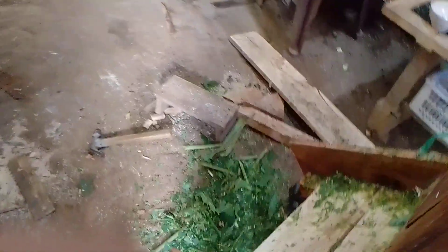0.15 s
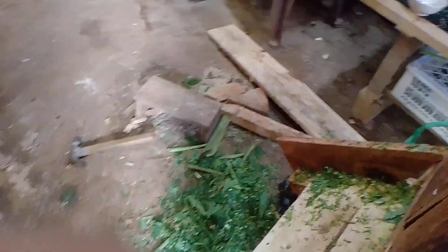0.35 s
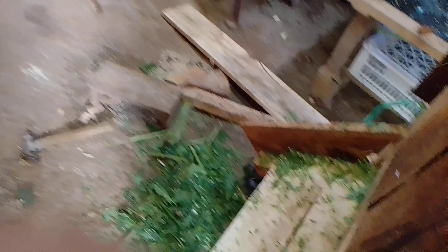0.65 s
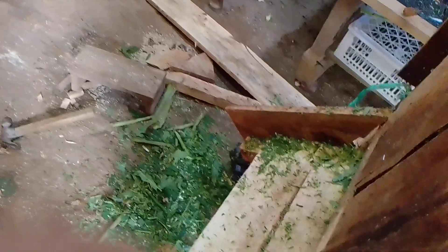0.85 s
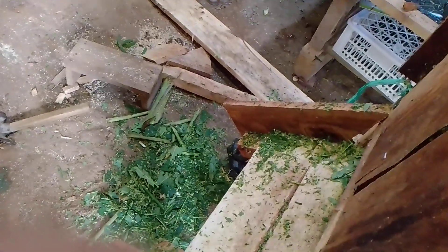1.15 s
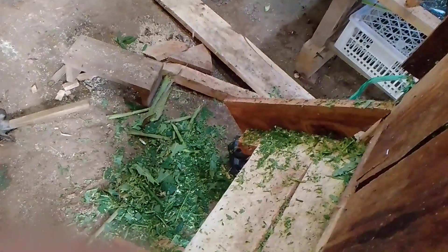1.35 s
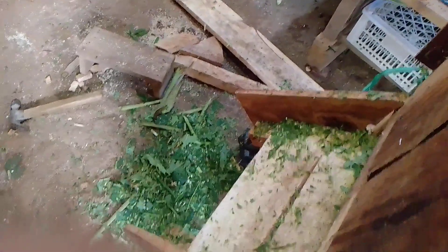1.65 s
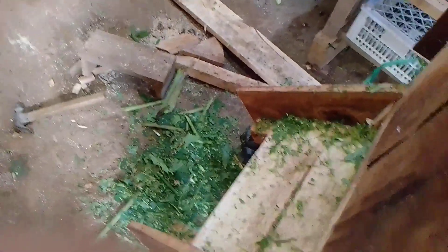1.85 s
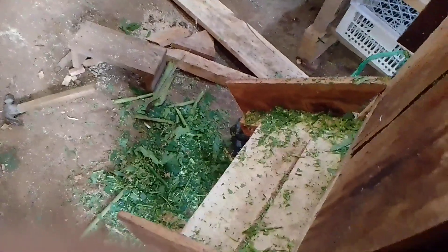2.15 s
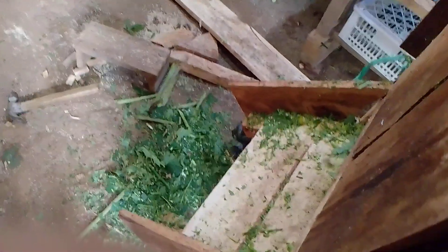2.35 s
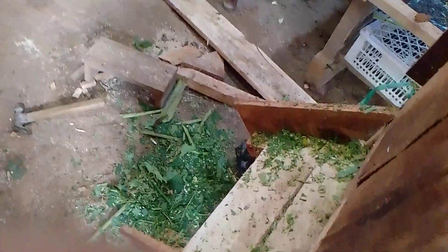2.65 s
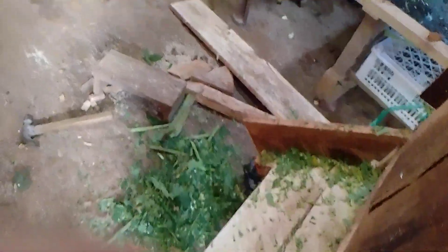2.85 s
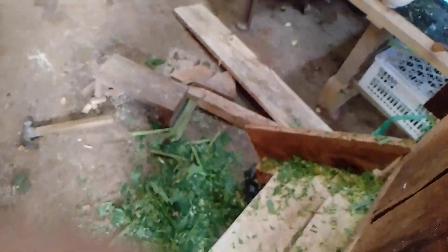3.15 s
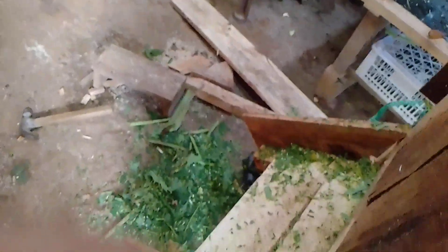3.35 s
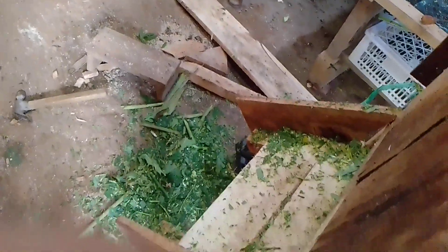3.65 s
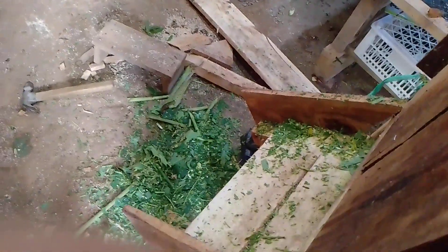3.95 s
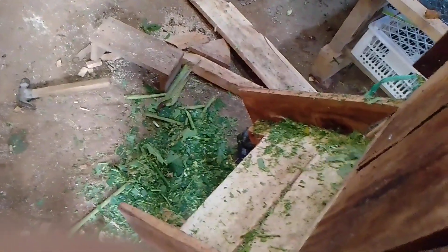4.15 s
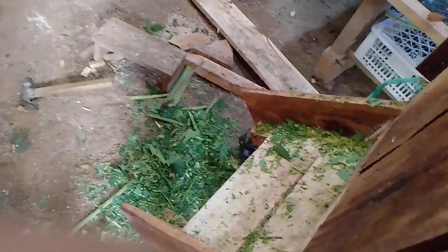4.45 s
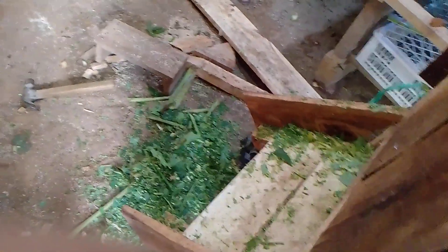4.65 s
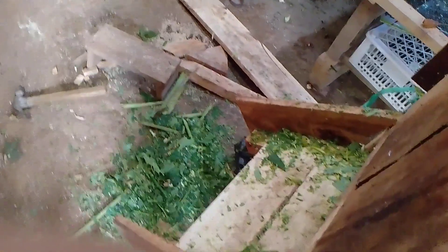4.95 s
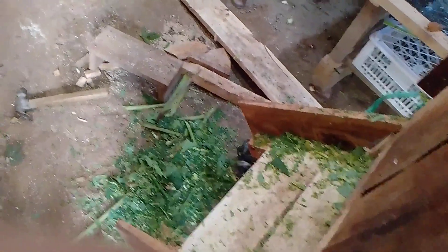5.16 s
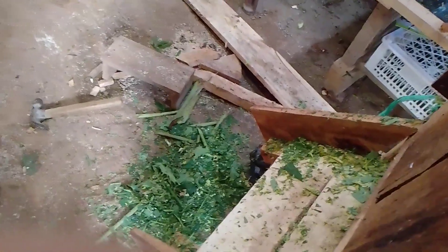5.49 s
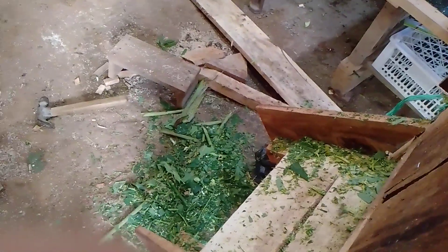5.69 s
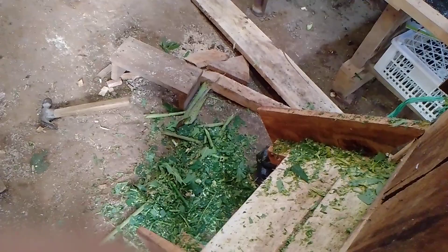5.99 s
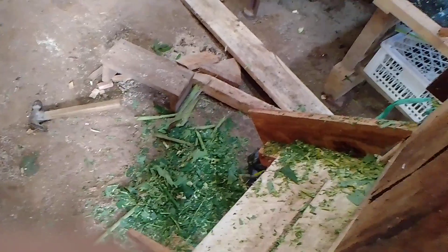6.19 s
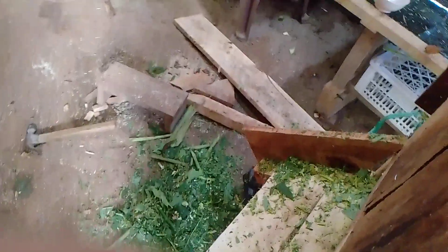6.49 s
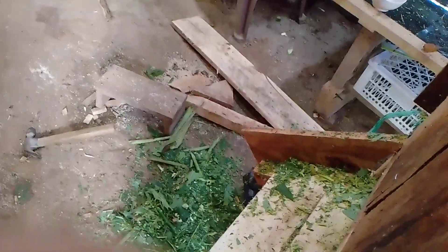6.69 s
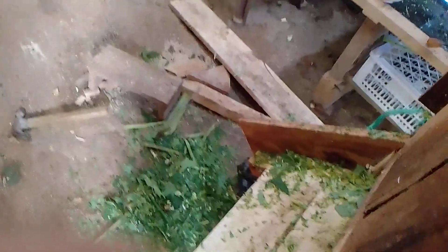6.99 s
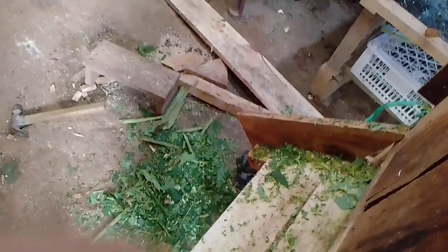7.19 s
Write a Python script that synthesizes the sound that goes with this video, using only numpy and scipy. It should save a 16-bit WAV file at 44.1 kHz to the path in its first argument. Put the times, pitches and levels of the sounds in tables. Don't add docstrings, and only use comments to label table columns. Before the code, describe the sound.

A homemade motor-driven chopper buzzes and whines steadily up close while stalks fed in ring the steel blades, snap sharply and rattle the wooden box.

```python
import sys
import numpy as np
from scipy import signal
from scipy.fft import rfft, irfft, next_fast_len
from scipy.io import wavfile
from scipy.ndimage import uniform_filter1d, map_coordinates

SR = 44100
rng = np.random.default_rng(int(sys.argv[2]) if len(sys.argv) > 2 else 0)


def inscribe(sig):
    pcm = np.round(np.clip(np.atleast_2d(sig).T, -1, 1) * 32767)
    wavfile.write(sys.argv[1], SR, pcm.astype(np.int16))


def gain_from_db(level_db):
    decades = np.asarray(level_db, float) / 20
    return 10 ** decades


N = 323253
TIME = np.arange(N) / SR
GRID = np.arange(0, N / SR + .01, .005)
LONG = next_fast_len(N)

IDLE_TURNS, MOTOR_LAG_S = 49.4, .06
STILL_S = 0.19
KNOCK_STEPS = 768
FLOW_USUAL_DB, RING_USUAL_DB = -41, -20
SPRAY_S = 0.038

# t/s, length/s, sag/(turns/s)
STALKS = [(.44, .1, .4), (.44, 2.66, .22), (1.33, .2, .8), (2.04, .22, 1.1), (2.59, .14, .42),
          (3.3, 1.34, .82), (3.5, .32, .7), (4.64, .2, .33), (5.17, .16, .35), (5.33, .64, .74),
          (5.74, .23, .3), (6.72, .7, .62), (6.72, .14, .4), (7.14, .3, .22)]
BOX_EDGES_HZ = [780, 1500, 2250, 4200, 6900]
# f/Hz, level/dB per Hz
BOX_COLOUR = [(150, -35.5), (300, -9), (800, -3.5), (1020, 2.5), (1300, -4), (2000, -6), (2950, -6.5),
              (4000, -13), (6500, -22.5), (7200, -36.5), (10300, -37.5), (12800, -50.5), (15700, -38.5)]
# usual level/dB, dB per dB of chaff, dB per dB of disc ring, dB per snap
BOX_PARTS = [(-33.5, .5, -0.21, 3), (-28.5, 0.82, -0.13, 1.5), (-25, .5, 0.16, 3), (-24.5, 0.5, 0.09, 2.5),
             (-35.5, 1.25, 0, 6), (-42.5, 1.5, 0, 0.5)]
# t/s, level/dB
CHAFF_FLOW = [(0.0, -41.5), (0.24, -42), (0.47, -34), (0.53, -37.5), (1.47, -36), (1.51, -41), (1.71, -37),
              (2.16, -42.5), (2.23, -41.5), (2.51, -44), (3.98, -39), (4.96, -39.5), (5.0, -43), (5.2, -37),
              (6.55, -42.5), (6.78, -39.5), (7.23, -38), (7.33, -34)]
# f/Hz, width/Hz, level/dB
DISC_RINGS = [
    [(1747, 44, 0)],
    [(2398, 30, 0)],
    [(2797, 28, 0)],
    [(3255, 10, 0)],
    [(3350, 60, 0), (3450, 60, -3), (3542, 40, 0)],
    [(3061, 11, 0)],
]
BEAMING = [
    [(-2, .34), (2, .26)],
    [(-4, .2), (-2, .75), (2, -.5), (4, .45)],
    [(-6, .2), (-4, -.28), (-2, .46), (2, .3)],
    [],
    [],
    [],
]
UNTOUCHED_DB = [-31, -39, -53, -34.5, -34.5, -37.5]
# t/s, length/s, level/dB
MAIN_TOUCH = [(.45, 0.095, -18.5), (.62, 0.49, -30), (1.29, 0.084, -16), (1.47, 0.11, -15),
              (1.61, 0.044, -15), (1.7, 0.19, -26.5), (1.86, 0.078, -17.5), (1.93, 0.17, -14.5),
              (2.08, 0.095, -11), (2.2, 0.13, -15), (2.28, .1, -12.5), (2.4, 0.37, -15), (2.64, 0.098, -13),
              (2.76, 0.095, -19), (2.84, 0.144, -16.5), (3.01, 0.21, -19.5), (3.18, 0.16, -13),
              (3.36, .07, -17.5), (3.44, 0.072, -16), (3.59, 0.25, -23), (4.02, 0.1, -19.5),
              (4.11, 0.57, -17), (4.72, 0.063, -21.5), (4.84, 0.053, -18.5), (5.06, .03, -23),
              (5.09, 0.06, -20.5), (5.28, 0.12, -16), (5.44, 0.099, -18.5), (5.52, 0.47, -16.5),
              (6.02, 0.21, -28.5), (6.62, 0.023, -23), (6.69, 0.032, -18), (6.79, 0.14, -18.5),
              (6.955, 0.46, -17.5)]
# t/s, length/s, level/dB
SECOND_TOUCH = [(.55, .9, -24.5), (1.33, 0.17, -27.5), (2.05, 0.063, -22), (2.18, 0.07, -24),
                (2.39, .16, -22), (2.72, 0.037, -38), (2.795, 0.092, -20), (2.94, 0.12, -20.5),
                (3.12, 0.12, -28), (3.33, 0.088, -17), (3.43, 0.202, -20.5), (3.66, 0.19, -16.5),
                (3.91, 0.2, -18.5), (4.13, 0.25, -33), (4.5, 0.076, -32.5), (4.59, 0.065, -27),
                (5.1, 0.15, -22.5), (5.28, 0.15, -23.5), (5.509, 0.089, -21.5), (5.63, 0.12, -18.5),
                (5.8, 0.038, -23), (5.88, 0.12, -25), (6.65, .06, -19), (6.71, 0.088, -13.5),
                (6.82, 0.19, -24), (6.93, .06, -20), (6.99, 0.14, -16.5), (7.16, 0.18, -27.5)]
# t/s, length/s, level/dB
THIRD_TOUCH = [
    (.5, 1.2, -30.5),
    (2.072, 0.036, -19),
    (2.45, 0.052, -23.5),
    (2.62, 0.11, -21),
    (2.72, 0.11, -15),
    (2.85, 0.2, -27),
    (3.88, 0.18, -24),
    (4.7, .8, -34),
]
# t/s, length/s, level/dB
RIM_TOUCH = [(.36, 0.12, -26.5), (.5, 1, -33), (3.1, .2, -33), (3.64, 0.23, -27), (4.26, 0.15, -22.5),
             (4.52, 0.34, -25.5), (4.85, 0.18, -38), (5.11, 0.14, -28), (5.24, .08, -24), (5.49, 0.14, -26),
             (5.63, 0.051, -22), (5.78, 0.036, -33), (5.95, 0.065, -23), (6.02, 0.27, -24),
             (6.22, .18, -28), (6.4, 0.18, -33), (6.62, 0.28, -28), (6.88, 0.078, -21.5), (7.0, 0.18, -29),
             (7.24, 0.11, -23)]
# t/s, length/s, level/dB
EDGE_TOUCH = [
    (0.901, 0.55, -41),
    (2.19, 0.12, -25),
    (2.38, 0.2, -25),
    (2.72, 0.55, -26),
    (3.92, 0.34, -25.5),
    (4.3, 0.38, -27),
    (5.11, 0.19, -24),
    (6.66, 0.084, -38),
]
# t/s, length/s, level/dB
LOW_RIM_TOUCH = [
    (0, 0.31, -28),
    (1.3, 0.11, -28.5),
    (1.7, 0.15, -25),
    (3.64, 0.13, -25.5),
    (4.27, 0.18, -24.5),
    (4.52, 0.078, -25.5),
    (6.02, 0.055, -27),
    (6.88, .08, -30),
]
# f/Hz, width/Hz, level/dB
TICK_MODES = [(4080, 620, 7), (4700, 900, 0), (5600, 1500, -14), (8930, 280, -11), (11000, 1800, -27),
              (15500, 960, -19)]
# t/s, length/s, level/dB
TICK = [(0, .36, -33), (.36, .55, -33.5), (1.0, .3, -28.5), (1.32, .18, -31), (1.6, .1, -29),
        (1.68, .22, -26), (1.9, .13, -29), (2.2, .15, -37), (3.2, .3, -39), (3.75, .45, -35),
        (5.2, .85, -38), (6.62, .12, -31), (6.85, .48, -38)]
# t/s, length/s, f/Hz, width/Hz, level/dB
SCRAPES = [(.0, .25, 3000, 200, -27), (.2, .25, 3250, 200, -31), (.15, .35, 2750, 180, -28.5),
           (.3, .2, 2250, 400, -31), (.45, 1.0, 3480, 250, -31), (1.505, .5, 8800, 500, -46),
           (1.9, .35, 1300, 200, -23), (2.354, 1.0, 1340, 245, -26), (3.08, .13, 5800, 1500, -35),
           (3.9, 1.1, 560, 150, -34), (3.62, .2, 4400, 200, -33), (3.9, .32, 4700, 500, -32),
           (5.143, .17, 5520, 540, -29), (5.96, .3, 4640, 450, -33), (2.18, .15, 4400, 1000, -28),
           (5.98, .75, 2950, 200, -31), (6.1, .65, 2720, 130, -33), (.45, 1.65, 2890, 90, -31),
           (6.68, .3, 4500, 400, -33), (6.95, .35, 5700, 500, -37), (.7, .45, 3550, 150, -31),
           (2.75, .55, 3430, 320, -29), (3.93, .7, 3430, 320, -28), (4.58, .25, 8200, 250, -48),
           (5.1, .95, 8100, 250, -47), (6.4, .93, 8100, 250, -46), (3.85, .4, 9100, 250, -48),
           (5.1, .95, 9100, 250, -49)]
PURE_HZ = [2285, 2707, 2895, 4353, 4452, 4648, 4748, 5093, 5308, 5410, 5922, 6115, 6503, 6697]
# t/s, length/s, level/dB
PURE_TOUCH = [
    [(3.6, .2, -31), (3.92, .75, -28.5), (4.7, .25, -32), (5.45, .5, -30), (6.82, .36, -28)],
    [(.1, .7, -36), (4.9, .2, -37), (6.3, .4, -33)],
    [(0, .45, -35), (1.7, .3, -33), (4.7, .4, -36), (6.1, .6, -34)],
    [(.3, .2, -40), (3.0, .3, -36), (3.66, .12, -33), (4.3, .22, -37), (5.93, .3, -33), (6.8, .12, -32)],
    [(.6, .3, -38), (1.93, .1, -35), (2.72, .25, -35), (3.66, .5, -34), (6.2, .35, -37), (6.73, .27, -32)],
    [(5.97, .17, -27), (6.14, .15, -32)],
    [(3.9, .3, -35)],
    [(2.8, .9, -39), (5.08, .08, -35), (6.6, .12, -36)],
    [(.55, .4, -41), (3.9, .4, -39)],
    [(5.15, .14, -31)],
    [(3.08, .12, -39), (4.2, .3, -43), (6.2, .4, -44)],
    [(2.85, .55, -40), (4.9, .2, -42), (5.08, .1, -36), (6.65, .1, -36), (6.85, .17, -38)],
    [(4.1, .48, -42)],
    [(3.08, .12, -39), (5.4, .25, -43)],
]
# t/s, length/s, level/dB
SEVENTH = [
    (0, 0.55, -39),
    (2.05, 0.23, -30.5),
    (2.45, 1.12, -37),
    (3.95, 0.59, -37.5),
    (5.13, 0.22, -33),
    (6.03, 0.58, -39.5),
]
# t/s, length/s, level/dB
EIGHTH = [
    (.4, 0.11, -35.5),
    (.92, 0.71, -41),
    (2.0, 0.18, -35),
    (2.2, 0.082, -29.5),
    (3.37, 1.18, -34.5),
    (3.6, 0.099, -27.5),
    (4.57, 0.76, -41.5),
    (5.3, 0.34, -39),
    (5.8, 1.1, -41.5),
]
# t/s, length/s, level/dB
NINTH = [
    (1.3, 0.42, -37.5),
    (1.86, 0.82, -33.5),
    (2.67, 1, -38.5),
    (3.86, 0.93, -36),
    (5.14, 0.21, -38),
]
# t/s, length/s, level/dB
FRAME_MODE = [
    (.63, 1.4, -29),
    (3.06, 0.12, -31.5),
    (3.4, 0.097, -28.5),
    (3.9, 0.88, -24.5),
    (5.35, 0.46, -32.5),
    (6.86, 0.2, -29),
]
# t/s, length/s, level/dB
FOURTH = [
    (1.27, 1.0, -42.5),
    (3.09, .56, -38),
    (3.85, 0.91, -37),
    (5.12, 0.18, -33),
    (5.37, 0.35, -40),
    (6.62, 0.6, -39),
]
# shaft multiple, level/dB
HUM_ORDERS = [(1, -71), (2, -60), (3, -62.5), (5, -53.5)]
# f/Hz, level/dB
MAINS = [(100.5, -55), (204, -49.5), (302, -46.5)]
# t/s, length/s, level/dB
DRUMMING = [(.3, 0.6, -29), (.94, 0.64, -27), (1.71, 0.23, -24), (2.0, 0.22, -32), (2.8, .38, -38),
            (3.38, .04, -23), (3.52, 0.13, -34), (3.9, 1.5, -32.5), (5.19, 0.15, -32), (5.35, 0.2, -32),
            (6.0, 0.7, -28)]
# t/s, length/s, shaft multiple, level/dB
WEDGED = [(1.95, 0.17, 20, -30.5), (1.95, 0.14, 21, -38), (1.9, .22, 26, -31), (2.12, 0.17, 20, -29.5),
          (2.12, 0.12, 22, -28.5), (2.45, 0.39, 21, -29.5), (2.85, .33, 20, -35), (2.9, .28, 21, -33),
          (2.85, 0.37, 23, -35), (2.4, 0.34, 26, -36), (3.38, 0.31, 20, -31), (3.38, .26, 22, -37),
          (3.6, 0.64, 21, -36), (3.95, 0.68, 23, -31), (5.18, 0.16, 20, -31), (5.18, 0.17, 21, -29),
          (5.18, 0.175, 26, -27), (3.95, 0.66, 11, -40), (3.9, 0.41, 13, -37), (6, 0.68, 10, -38.5),
          (0.5, .5, 10, -43), (0.75, 0.99, 10, -39), (4.75, .5, 6, -41), (0.56, 0.91, 6, -40),
          (2.3, .9, 11, -44), (2.1, .65, 13, -40.5), (2.55, .4, 28, -33), (2.55, .35, 30, -31),
          (4.1, .55, 49, -32)]
# t/s, peak level/dB
SNAPS = [(0.5127, -27), (1.345, -36), (1.409, -15), (2.21, -14.5), (2.395, -15.5), (2.4776, -20),
         (3.089, -21), (3.153, -12.5), (3.328, -13), (3.5755, -10.5), (3.657, -13), (3.89, -12),
         (3.95, -16), (5.098, -18), (5.141, -32), (5.296, -15), (5.398, -13.5), (5.5002, -24),
         (5.79, -15.5), (6.648, -18), (6.685, -16.5), (6.878, -17.5), (5.115, -16), (5.853, -17),
         (6.019, -20), (6.707, -27), (6.955, -27), (6.994, -29)]
# t/s, length/s, level/dB
REBOUND = [
    (.55, 0.29, -41),
    (1.0, 0.1, -31),
    (1.29, 0.21, -28.5),
    (1.7, .33, -29),
]


def evened(x):
    return x / np.sqrt(np.mean(x ** 2) + 1e-20)


def levelled(x, db, hold=0.068):
    power = abs(uniform_filter1d(x ** 2, max(int(hold * SR), 64)))
    return gain_from_db(db) * x / np.sqrt(power + 1e-20)


def modes(x, table):
    out = np.zeros(len(x))
    for k, (hz, width, db) in enumerate(table):
        r = np.exp(-np.pi * width / SR)
        rung = signal.lfilter([1 - r], [1, -r * np.exp(2j * np.pi * hz / SR)], x).real
        out += (-1) ** k * gain_from_db(db) * 2 * rung
    return out


def twice(x, hz, width, db=0):
    return modes(modes(x, [(hz, width, 0)]), [(hz, width, db)])


def band(x, lo_hz, hi_hz):
    return signal.sosfilt(signal.butter(2, [lo_hz, hi_hz], "band", fs=SR, output="sos"), x)


def waver(smooth):
    size = max(int(smooth * SR), 64)
    return evened(uniform_filter1d(uniform_filter1d(rng.standard_normal(N), size), size))


def held(rows, rest_db, rise_s, fall_s):
    s, length, db = np.transpose(rows)[..., None]
    press = np.clip((GRID - s) / rise_s + .5, 0, 1)
    release = np.exp(-np.maximum(GRID - s - length, 0) / fall_s)
    loudest = (gain_from_db(db) * press * release).max(axis=0)
    return np.interp(TIME, GRID, 20 * np.log10(np.maximum(gain_from_db(rest_db), loudest)))


def sag():
    s, length, lost = np.transpose(STALKS)[..., None]
    keep = np.exp(-GRID[1] / MOTOR_LAG_S)
    brake = (lost * ((GRID >= s) & (GRID < s + length))).sum(axis=0)
    return np.interp(TIME, GRID, signal.lfilter([1 - keep], [1, -keep], brake))


def order(turns, multiple, db):
    level = gain_from_db(db + 1.8 * waver(smooth=0.025))
    return np.sqrt(2) * level * np.cos(2 * np.pi * (round(multiple) * turns + rng.random()))


def blows(turns, angle, scatter_db):
    whole = np.arange(1, int(turns[-1]))
    place = np.interp(whole - angle, turns, np.arange(N - 0.))
    size = gain_from_db(scatter_db * rng.standard_normal(len(whole)))
    at = place.astype(int)
    out = np.zeros(N + 1)
    out[at] = size * (1 - place % 1)
    out[at + 1] = size * (place % 1)
    return out[:N]


def ring_levels():
    tables = MAIN_TOUCH, SECOND_TOUCH, THIRD_TOUCH, RIM_TOUCH, EDGE_TOUCH, LOW_RIM_TOUCH
    main, *rest = [held(t, db, rise_s=.022, fall_s=.025) for t, db in zip(tables, UNTOUCHED_DB)]
    return [main - 15 * np.clip(2 - TIME / STILL_S, 0, 1)] + rest


def repeat_share():
    return np.clip(.7 + .015 * (ring_levels()[0] - RING_USUAL_DB) - .06 * sag(), .4, .92)


def rattle(turns, spread_db, forget):
    count = int(turns[-1]) + 2
    shape = 2, count, KNOCK_STEPS
    knocks = rng.standard_normal(shape)
    knocks = knocks * gain_from_db(min(spread_db, 4) * np.minimum(rng.exponential(1, shape), 3))
    repeat = 1 - .75 * (1 - repeat_share())
    memory = np.clip(1 - forget * (1 - np.interp(np.arange(count), turns, repeat)), 0, 1)
    pattern = [knocks[0, 0]]
    for keep, new in zip(memory[1:], knocks[0, 1:]):
        pattern.append(keep * pattern[-1] + np.sqrt(1 - keep ** 2) * new)
    place = [turns * KNOCK_STEPS]
    kept, fresh = (map_coordinates(np.ravel(p), place, order=3, prefilter=False) for p in (pattern, knocks[1]))
    return evened(np.sqrt(repeat) * kept + np.sqrt(1 - repeat) * fresh)


def box_levels():
    flow = np.interp(TIME, *np.transpose(CHAFF_FLOW)) - FLOW_USUAL_DB
    ringing = uniform_filter1d(ring_levels()[0], size=6000) - RING_USUAL_DB
    s, db = np.transpose(SNAPS)[..., None]
    sprays = gain_from_db(db + 16.0) * (GRID > s) * np.exp(-abs(GRID - s) / SPRAY_S)
    spray = np.interp(TIME, GRID, sprays.sum(axis=0))
    return [db + by_flow * flow + by_ring * ringing + by_snap * spray for db, by_flow, by_ring, by_snap in BOX_PARTS]


def box(turns):
    hz = np.fft.rfftfreq(LONG, 1 / SR)
    f, colour_db = np.transpose(BOX_COLOUR)
    loose = evened(rng.standard_normal(N) * gain_from_db(2.5 * np.minimum(rng.exponential(1, N), 3)))
    share = np.where(hz < BOX_EDGES_HZ[3], 0, .4)
    z = np.sqrt(1 - share) * rfft(rattle(turns, spread_db=3.0, forget=0.31), LONG)
    z = z + np.sqrt(share) * rfft(loose, LONG)
    z = z * gain_from_db(np.interp(np.log(hz + 1), np.log(f), colour_db))
    part = np.digitize(hz, BOX_EDGES_HZ)
    chop = 1 + 1.1 * np.exp(-((turns + .62) % 1) / 0.28) + .5 * np.exp(-((turns + .12) % 1) / 0.049)
    out = np.zeros(N)
    for k, db in enumerate(box_levels()):
        boards = irfft(z * (part == k), LONG)[:N]
        if k > 3:
            boards = boards * chop
        out += levelled(boards, db + 1.71 * waver(smooth=0.022))
    return out


def ring(x, table, sides, turns):
    carrier = signal.hilbert(sum(twice(x, *mode[:2], 0) * gain_from_db(2 * mode[2]) for mode in table), LONG)[:N]
    beam = 1 + sum(share * np.exp(2j * np.pi * k * turns) for k, share in sides)
    return (carrier * beam).real


def disc(turns):
    second = np.clip(.4 * sag(), 0, .4) * blows(turns, angle=.35, scatter_db=1.5)
    strike = evened(blows(turns, angle=.85, scatter_db=1.) + second)
    rubbing = rattle(turns, spread_db=2.5, forget=.2)
    rubbing_db = [-15, -13, -14, -4, 2, -2]
    out = np.zeros(N)
    for db, table, sides, level in zip(rubbing_db, DISC_RINGS, BEAMING, ring_levels()):
        one = ring(strike + gain_from_db(db) * rubbing, table, sides, turns)
        out += levelled(one, level + 1.7 * waver(smooth=0.031), hold=.05)
    return out


def tick(turns):
    brush = np.exp(-((turns + .62) % 1) / .14) * rattle(turns, spread_db=2.5, forget=.3)
    drive = evened(blows(turns, angle=.62, scatter_db=2.)) + .7 * evened(brush)
    rung = sum(twice(drive, hz, width, db) for hz, width, db in TICK_MODES)
    return levelled(rung, held(TICK, -51, rise_s=0.074, fall_s=0.017))


def scrapes(turns):
    drive = evened(blows(turns, angle=.55, scatter_db=1.5)) + 1.2 * rattle(turns, spread_db=2.5, forget=.2)
    out = np.zeros(N)
    for s, length, hz, width, db in SCRAPES:
        u = np.clip((TIME - s) / length, 0, 1)
        out += gain_from_db(db) * np.sin(np.pi * u ** 0.47) * evened(twice(drive, hz, width))
    return out


def blades(turns):
    out = np.zeros(N)
    for hz, rows in zip(PURE_HZ, PURE_TOUCH):
        lean = 2 * np.pi * rng.random()
        beam = 1 + .8 * np.cos(4 * np.pi * turns + lean) + .5 * np.cos(8 * np.pi * turns + 3 * lean)
        db = held(rows, rest_db=-51.5, rise_s=0.054, fall_s=0.043) + 2.3 * waver(smooth=0.036)
        out += gain_from_db(db) * beam * np.cos(2 * np.pi * hz * TIME + 0.83 * waver(smooth=0.044))
    return np.sqrt(2) * out


def frame(turns):
    tables = SEVENTH, EIGHTH, NINTH, FRAME_MODE
    *levels, mode_db = (held(t, rest_db=-57.0, rise_s=0.034, fall_s=0.021) for t in tables)
    mode = levelled(modes(rattle(turns, spread_db=-0.5, forget=0.088), [(875, 8, 0)]), mode_db)
    return mode + sum(order(turns, k, db) for k, db in zip((7, 8, 9), levels))


def hum(turns):
    fourth = order(turns, 4, held(FOURTH, -44.0, rise_s=0.063, fall_s=0.064))
    return fourth + order(turns, 6, -35 - 21 * sag())


def steady(turns, machine):
    loud_db = 10 * np.log10(abs(uniform_filter1d(machine ** 2, size=8000)) + 1e-9) + 15
    mains = sum(np.sqrt(2) * gain_from_db(db - 19 * sag()) * np.cos(2 * np.pi * hz * TIME) for hz, db in MAINS)
    wash = gain_from_db(-61.5) * evened(band(rng.standard_normal(N), 25, 220))
    weak = sum(order(turns, k, db) for k, db in HUM_ORDERS)
    return gain_from_db(-1.1 * loud_db) * (wash + mains + weak)


def panel():
    drummed = twice(rng.standard_normal(N), 1026.0, 95)
    return levelled(drummed, held(DRUMMING, -41.5, rise_s=0.017, fall_s=0.038))


def wedged(turns):
    out = np.zeros(N)
    for s, length, k, db in WEDGED:
        out += order(turns, k, held([(s, length, db)], rest_db=-59, rise_s=0.064, fall_s=0.0092))
    return out


def snaps():
    t = TIME[:4000]
    body_fade = np.exp(-t / 0.004) + 1.44 * np.exp(-t / 0.092)
    bright_fade = np.exp(-t / 0.0087)
    out = np.zeros((2, N + 4000))
    for s, db in SNAPS:
        burst = rng.standard_normal(4000) * [body_fade, bright_fade]
        out[:, round(s * SR):][:, :4000] += gain_from_db(db - 2.5) * burst
    return band(out[0, :N], 1260, 4020) + gain_from_db(-24) * band(out[1, :N], 3600, 6300)


def rebound(turns):
    tap = twice(blows(turns, angle=.3, scatter_db=2.5), 3500, 420)
    return levelled(tap, held(REBOUND, -55, rise_s=.05, fall_s=.04))


def shed(x):
    t = TIME[:SR // 4]
    hits = rng.choice([-1., 1.], len(t)) * (rng.random(len(t)) < 2000 / SR)
    taps = hits * gain_from_db(-60 * t / 0.15) * (t > .004)
    return signal.oaconvolve(x, taps / np.linalg.norm(taps))[:N]


def scene():
    turns = np.cumsum(IDLE_TURNS - sag()) / SR
    sharp = tick(turns) + scrapes(turns) + snaps() + rebound(turns)
    wood = box(turns) + frame(turns) + hum(turns) + panel() + wedged(turns)
    steel = disc(turns) + blades(turns)
    machine = wood + steel + sharp + gain_from_db(-13) * shed(sharp)
    return (machine + steady(turns, machine))[None]


def low_pass(x):
    return signal.sosfilt(signal.butter(12, 17090, fs=SR, output="sos"), x)


def record(dry):
    ceiling, edge_hz = .69, 15730
    limited = dry / (1 + abs(dry / ceiling) ** 6) ** (1 / 6)
    passed = np.fft.rfftfreq(LONG, 1 / SR) < edge_hz
    edged = irfft(rfft(limited, LONG) * passed, LONG)[:, :N]
    return low_pass(edged)


dry = scene()
out = record(dry)
inscribe(out)
```